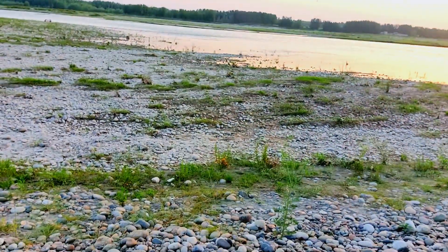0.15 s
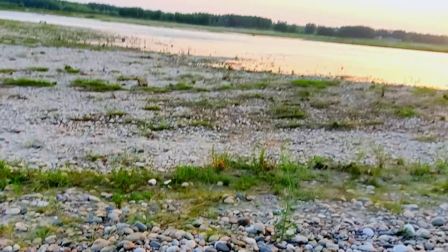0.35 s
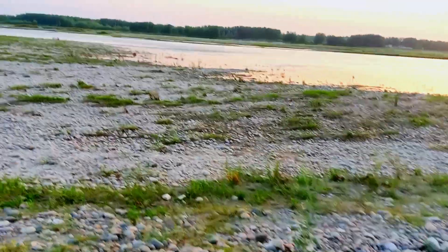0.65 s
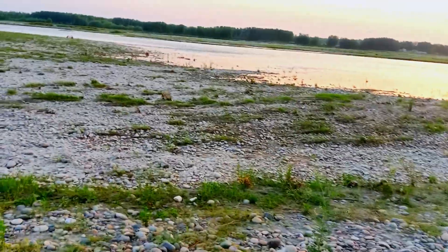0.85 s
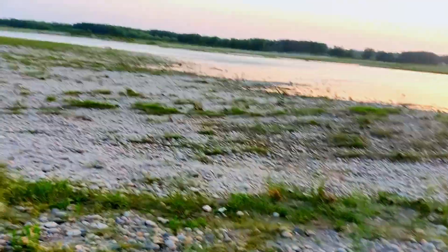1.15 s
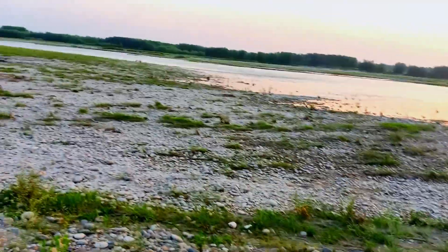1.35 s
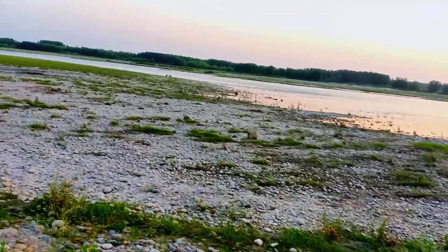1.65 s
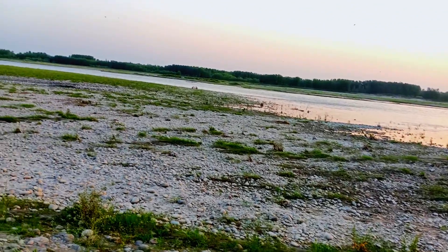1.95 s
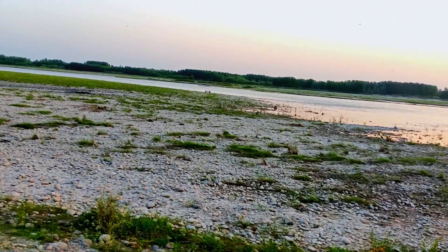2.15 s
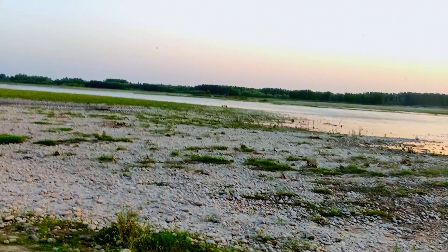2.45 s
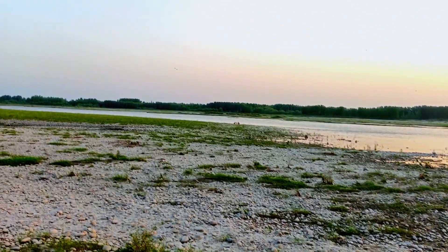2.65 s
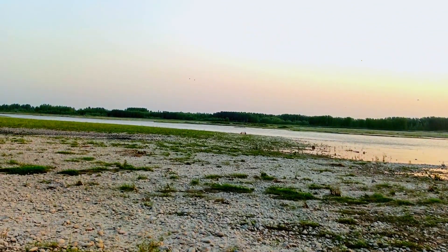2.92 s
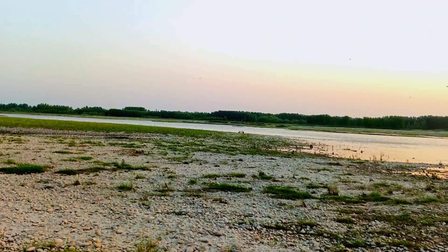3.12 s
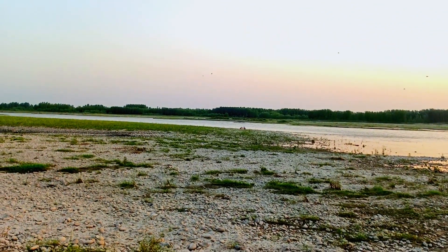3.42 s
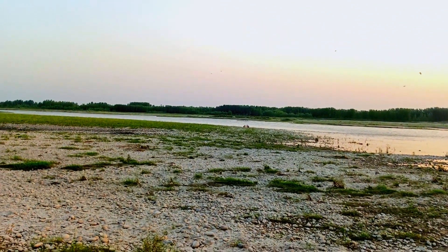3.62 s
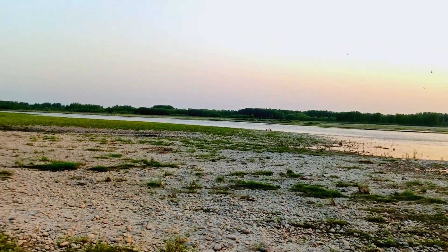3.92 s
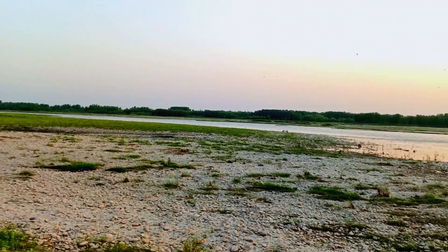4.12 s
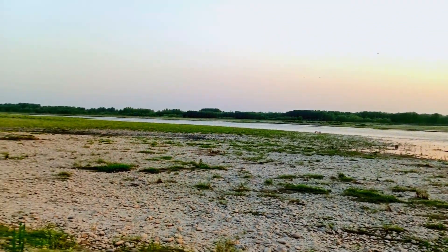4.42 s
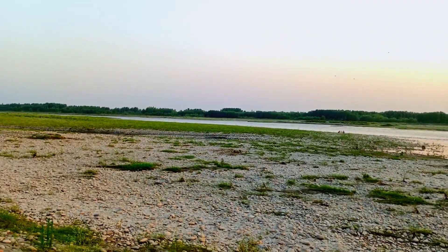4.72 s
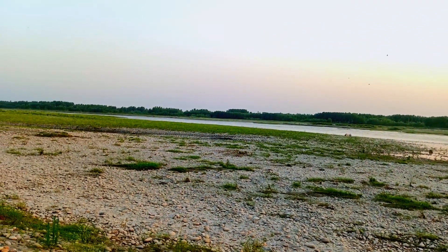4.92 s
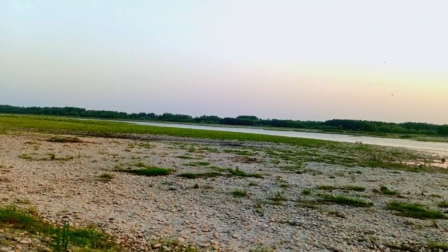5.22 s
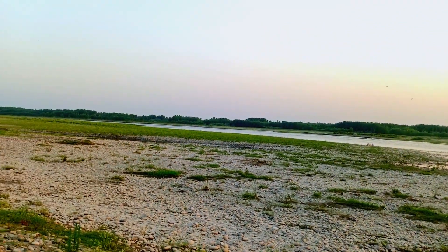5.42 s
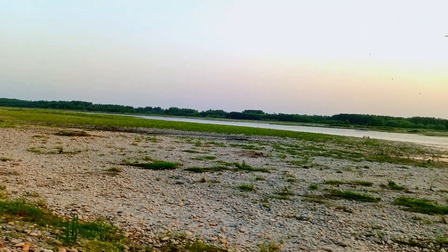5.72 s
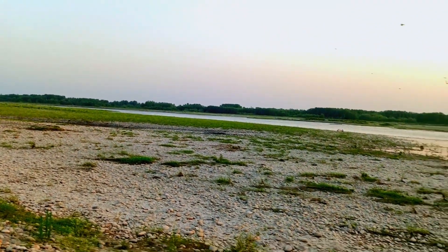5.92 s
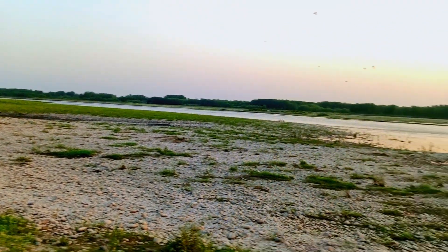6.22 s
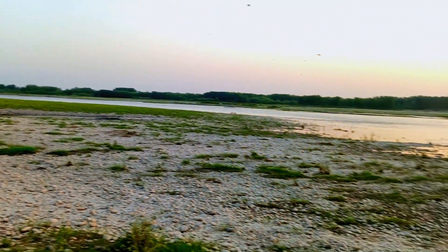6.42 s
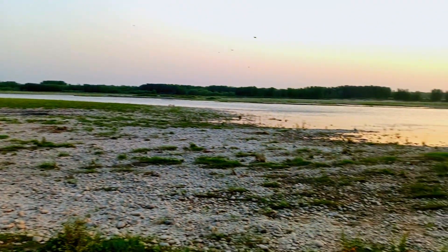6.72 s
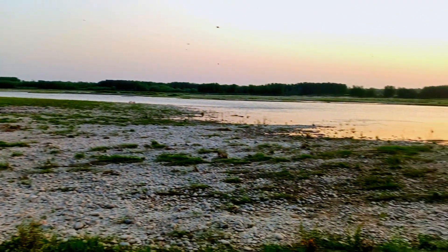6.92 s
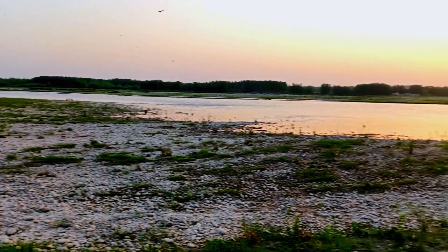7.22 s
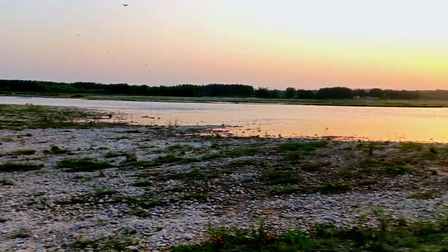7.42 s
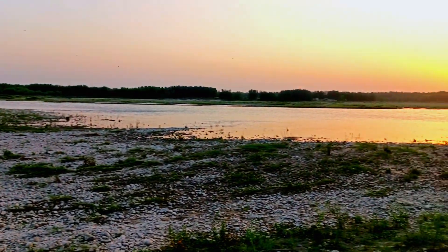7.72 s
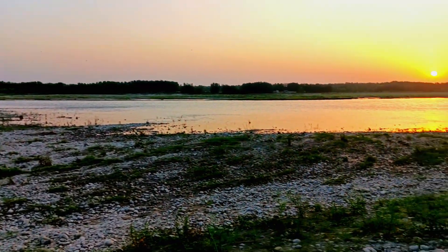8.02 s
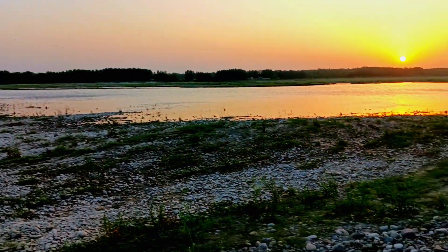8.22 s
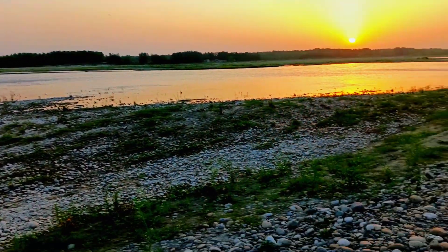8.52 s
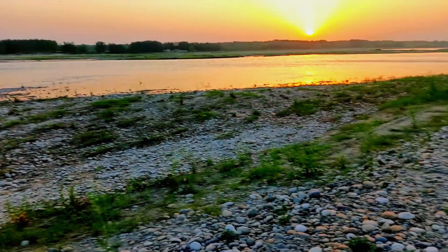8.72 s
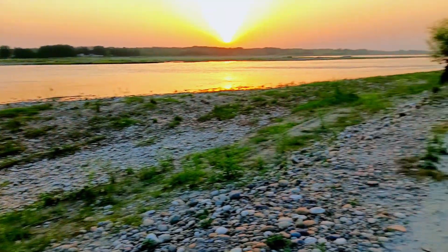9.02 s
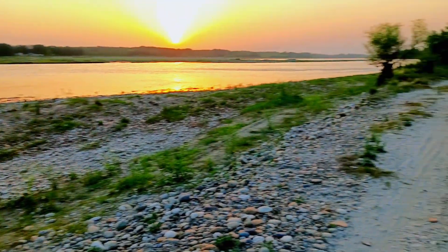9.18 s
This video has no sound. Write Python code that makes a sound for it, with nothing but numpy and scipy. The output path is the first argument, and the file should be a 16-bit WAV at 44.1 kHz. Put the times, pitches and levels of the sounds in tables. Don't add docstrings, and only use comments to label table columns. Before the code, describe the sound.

On an open gravel riverbank at dusk, a distant flock gives hoarse, overlapping squawks and croaks over a continuous high buzz of bush crickets. Early on, a shoe scrapes grit and pebbles snap close by. A clear two-note whistle falls around three seconds. Calls bunch and thin out, growing strong near seven to eight seconds. Low gusts boom in the hand-held microphone, and soft thumps come from the grip.

```python
import sys
import numpy as np
from scipy import signal
from scipy.fft import rfft, irfft
from scipy.io import wavfile
from scipy.ndimage import uniform_filter1d

SR = 44100
rng = np.random.default_rng(int(sys.argv[2]) if len(sys.argv) > 2 else 0)


def ratio_of_db(decibels):
    return 10 ** (np.asarray(decibels, float) / 20)


def generate_wav(sig):
    pcm = np.round(np.clip(np.atleast_2d(sig).T, -1, 1) * 32767).astype(np.int16)
    wavfile.write(sys.argv[1], SR, pcm)


N = 412335
TIME = np.arange(N) / SR


def rms_one(x):
    return x / np.sqrt(np.mean(x ** 2) + 1e-20)


def in_time(rows):
    s, *columns = np.transpose(rows)
    return [np.interp(TIME, s, c) for c in columns]


def drift(rate):
    r = np.exp(-80 * np.pi * rate / SR)
    slow = signal.lfilter([1], [1, -2 * r, r * r], rng.standard_normal(N // 40 + 2002))[2000:]
    return np.interp(np.arange(N) / 40, np.arange(len(slow)), rms_one(slow))


def coloured(spectrum):
    hz, level_db = np.transpose(spectrum)
    grid = np.log(np.fft.rfftfreq(N, 1 / SR) + 1)
    gain = ratio_of_db(np.interp(grid, np.log(hz), level_db))
    return rms_one(irfft(rfft(rng.standard_normal(N)) * gain, N))


def resonate(x, hz, width_hz, even=0.):
    turn = np.exp(2j * np.pi * np.cumsum(np.broadcast_to(hz, x.shape)) / SR)
    base = signal.lfilter(*signal.butter(3, width_hz / 2, fs=SR), x / turn)
    evened = base / (np.abs(base) + 1e-9) ** even
    return rms_one((evened * turn).real)


def rasp(per_s, breath, jitter, duty):
    cycles = np.cumsum(per_s * (1 + jitter * drift(25))) / SR
    clicks = (np.diff(np.floor(cycles), prepend=0) > 0) * ratio_of_db(2.1 * drift(52))
    puffs = rng.standard_normal(N) * np.exp(-(cycles % 1) / duty)
    breath = np.clip(breath, 0, 1)
    return (1 - breath) * rms_one(clicks) + breath * rms_one(puffs)


def kind(table, glide, width_hz):
    return [(s, s + length, hz * (1 - glide / 2), hz * (1 + glide / 2), width_hz, level_db)
            for s, length, hz, level_db in table]


def notes(rows, source, attack_s, even, sag=0., bend=0.82):
    out = np.zeros(N)
    for start, end, first_hz, last_hz, width_hz, level_db in rows:
        a, b = max(round(start * SR), 0), min(round(end * SR), N)
        age = np.arange(b - a) / SR
        progress = age / age[-1]
        shape = np.clip(np.minimum(age / attack_s, (age[-1] - age) / (0.37 * age[-1])), 0, 1)
        curve = bend if last_hz > first_hz else 1 / bend
        hz = first_hz + (last_hz - first_hz) * progress ** curve
        arched_hz = hz * (1 - sag * (2 * progress - 1) ** 2)
        out[a:b] += ratio_of_db(level_db) * shape * resonate(source[a:b], arched_hz, width_hz, even)
    return out


def bursts(tables):
    gains = np.zeros((len(tables[0][0]) - 1, N))
    for rows in tables:
        s, *levels_db = np.transpose(rows)
        span = slice(round(s[0] * SR), round(s[-1] * SR))
        t = TIME[span]
        edges = np.clip(np.minimum(t - s[0], s[-1] - t) / 0.015, 0, 1)
        gains[:, span] += edges * ratio_of_db(np.array([np.interp(t, s, level) for level in levels_db]))
    return gains


def swells(table, swell_db, fade_db):
    return bursts([[(start, *np.subtract(peak_db, swell_db)),
                    (top, *peak_db),
                    (end, *np.subtract(peak_db, fade_db))]
                   for start, top, end, *peak_db in table])


def flock():
    # start_s, length_s, middle_pitch_hz (top pitch for arches), level_db
    falls = [
        (0, 0.13, 1890, -44.5),
        (.163, 0.31, 1384, -47.5),
        (2.831, 0.19, 1120, -38.5),
        (2.912, .14, 1477, -40.5),
        (3.012, 0.41, 1420, -53),
        (4.69, 0.27, 1817, -39),
        (5.821, 0.197, 1430, -49),
        (7.248, 0.13, 1555, -42.5),
    ]
    croaks = [
        (.06, 0.31, 1880, -52),
        (.256, 0.2, 1800, -42),
        (2.668, 0.33, 1880, -41),
        (4.387, 0.43, 1500, -50),
        (6.594, 0.27, 1939, -42),
        (7.497, 0.22, 1946, -38.5),
        (8.12, .29, 1663, -35),
    ]
    murmurs = [(6.46, .11, 1870, -48), (5.47, .04, 880, -56), (6.08, .13, 2400, -62), (8.12, .1, 1280, -47),
               (8.24, .1, 1300, -49), (7.9, .07, 1290, -56), (7.86, .06, 1550, -52), (8.13, .2, 1800, -40),
               (2.69, .24, 2050, -45), (2.72, .2, 1850, -44), (3.3, .2, 1720, -43), (7.5, .2, 940, -58),
               (.38, 0.033, 2410, -55), (.56, 0.064, 1880, -53), (.65, 0.13, 1740, -55),
               (.76, .04, 2140, -58), (1.27, 0.18, 2050, -57.5), (1.28, 0.11, 1560, -54),
               (2.45, .05, 2644, -62), (7.08, .14, 1817, -47.5), (1.12, 0.11, 610, -61.5),
               (1.62, 0.071, 1840, -49.5), (1.785, .11, 1060, -50.5), (2.57, 0.11, 1353, -43),
               (2.9, 0.053, 2710, -60.5), (2.95, 0.085, 2000, -58), (3.21, 0.15, 1386, -47),
               (3.4, 0.24, 2500, -64), (3.88, 0.062, 604, -54), (4.0, .05, 595, -60),
               (4.27, .16, 1845, -47.5), (4.41, 0.048, 2670, -54), (6.64, 0.075, 900, -59),
               (6.88, .12, 1170, -52), (7.59, 0.12, 923, -58), (8.4, .15, 1890, -58), (8.4, .11, 1545, -56),
               (8.88, 0.068, 2000, -51), (8.89, .14, 1570, -55), (9.12, .07, 1860, -55),
               (9.2, .13, 1464, -55), (9.24, .08, 2400, -62.5), (2.76, 0.19, 4130, -64),
               (8.53, 0.27, 1770, -50.5)]
    holds = [(.74, .08, 1450, -47), (.762, 0.33, 1763, -49), (1.694, 0.12, 1800, -44),
             (1.77, 0.12, 2130, -46.5), (2.645, 0.22, 1405, -36), (3.065, 0.11, 1520, -42.5),
             (3.367, 0.12, 1290, -45.5), (4.545, 0.21, 1872, -44), (4.665, 0.093, 1497, -36.5),
             (5.141, 0.086, 1460, -47.5), (5.597, 0.082, 1430, -41), (5.84, 0.17, 1930, -50),
             (6.04, 0.23, 1456, -47.5), (6.457, 0.31, 1400, -49), (6.867, 0.17, 1430, -39),
             (6.943, .35, 1768, -47.5), (7.024, 0.14, 1280, -48.5), (7.51, 0.25, 1778, -35),
             (7.948, 0.2, 1500, -44), (8.965, 0.12, 1883, -41)]
    rises = [(1.104, .11, 1460, -42), (1.635, 0.25, 1405, -43.5), (1.778, .12, 1595, -36.5),
             (2.32, 0.34, 1680, -49), (3.292, 0.051, 2055, -36), (3.641, .17, 1585, -44.5),
             (3.828, 0.13, 1596, -49), (4.115, 0.12, 1595, -37.5), (5.481, 0.083, 1870, -43),
             (5.56, 0.28, 950, -55.5), (7.482, 0.12, 1516, -35.5), (7.719, 0.25, 1546, -53),
             (7.894, 0.13, 2000, -54.5), (7.964, 0.32, 1950, -41.5), (9.202, 0.2, 1935, -48)]
    sweeps = [
        (2.565, .21, 2540, -47.5),
        (2.6, 0.18, 4020, -51),
        (7.41, 0.085, 2700, -51.5),
        (1.114, 0.104, 2000, -46),
    ]
    squawks = [(1.637, 0.43, 1710, -44), (2.527, 0.084, 1540, -45), (2.577, 0.47, 1710, -41.5),
               (3.196, 0.098, 1510, -44), (3.294, 0.25, 1850, -37), (3.913, 0.23, 1835, -47),
               (4.037, 0.48, 1683, -45.5), (4.652, 0.34, 1773, -35), (4.867, 0.26, 1660, -48),
               (5.45, 0.16, 1693, -41), (5.58, .3, 1600, -46), (5.801, 0.45, 1606, -49),
               (5.828, 0.49, 2640, -65), (6.845, 0.29, 1784, -34.5), (7.235, 0.25, 1750, -43),
               (7.395, 0.48, 1733, -39), (8.16, 0.16, 1602, -39), (8.39, 0.16, 1680, -57)]
    arches = [(5.58, .27, 1960, -45), (2.68, 0.23, 2245, -49), (3.292, 0.19, 2207, -43),
              (3.92, 0.19, 2220, -52), (4.66, .3, 2320, -54), (6.597, 0.19, 2320, -45),
              (6.853, 0.24, 2295, -41), (7.5, 0.26, 2255, -50), (8.15, .22, 2200, -44.5),
              (7.22, .16, 2180, -50)]
    voice, harsh = rasp(95, 0.59, .12, 0.59), rasp(150, .36, .045, .8)
    other_voice = voice[::-1]
    near = notes(kind(rises, 0.08, 150) + kind(holds, -0.032, 113), voice, 0.016, 0.35)
    near = near + notes(kind(falls, -.2, 88), voice, .016, .6, bend=1.0)
    near = near + notes(kind(squawks, 0.0055, 530) + kind(croaks, 0.021, 370), harsh, 0.014, 0.27)
    near = near + notes(kind(arches, -.02, 152), harsh, 0.0092, 0.26, sag=.14)
    near = near + notes(kind(sweeps, 0.18, 170), other_voice, 0.017, 0.24, bend=.5)
    near = near + notes(kind(murmurs, -0.034, 101), other_voice, 0.016, 0.37)
    far = crowd(1334, 2070, 130, -73, count=260)
    high_streaks = crowd(2400, 9200, 120, -88, count=230)
    return near + barks() + far + high_streaks


def crowd(low_hz, high_hz, width_hz, level_db, count):
    draws = rng.random((count, 5))
    starts = 9.2 * draws[:, 0]
    ends = starts + 0.067 + 0.12 * draws[:, 2]
    pitches = low_hz * (high_hz / low_hz) ** draws[:, 1]
    last_pitches = pitches * (1 + 0.066 * (draws[:, 3] - .5))
    rows = np.transpose([starts, ends, pitches, last_pitches, width_hz + 0 * starts, level_db + 15.8 * draws[:, 4]])
    return notes(rows, rasp(110, 1.0, .15, 0.42), 0.0096, 0.067)


def crickets():
    # time_s, near_db, far_db
    group_levels = [(0, -58, -79), (.36, -53, -61), (.55, -58, -66.5), (.85, -50, -77), (1.17, -57, -77),
                    (1.28, -69, -83), (1.53, -51, -64), (1.85, -57, -69), (2.08, -69, -81),
                    (2.33, -51, -68), (2.7, -55, -75), (3.67, -50, -66), (4.9, -54.5, -74),
                    (5.36, -51.5, -66.5), (7.29, -50.5, -63.5), (8.44, -51, -64.5), (8.75, -50.5, -72.5),
                    (9.35, -49, -59.5)]
    # time_s, pitch_hz
    far_pitch = [(0.0, 9370), (0.75, 9320), (2.08, 9410), (2.63, 9250), (4.32, 9380), (5.18, 9310),
                 (5.75, 9460), (6.48, 9370), (9.35, 9260)]
    # start_s, length_s, middle_pitch_hz, level_db
    stray_buzzes = [
        (3.2, .95, 8770, -74),
        (8.0, 0.68, 9680, -64.5),
        (8.87, 0.5, 8543, -62),
    ]
    near_db, far_db = in_time(group_levels)
    near = resonate(rasp(66.2, .95, .004, .75), 7800, 600)
    near = near + 0.7 * resonate(rasp(62.5, 0.86, 0.0066, 1.0), 7505, 460)
    strokes = rasp(60.7, .95, .004, .5)
    far = resonate(strokes, in_time(far_pitch)[0], 470)
    shrill = resonate(rasp(58, 0.7, 0.0027, 0.74), 10800, 500)
    far = far + 0.16 * ratio_of_db(1.5 * drift(3.6)) * shrill
    strays = notes(kind(stray_buzzes, glide=.01, width_hz=200), strokes, 0.062, 0)
    near_gain, far_gain = ratio_of_db(near_db + 1.0 * drift(0.74)), ratio_of_db(far_db + 2.4 * drift(4.8))
    return near_gain * rms_one(near) + far_gain * far + strays


def air():
    # time_s, level_db
    hiss_level = [(0.0, -74), (1.48, -72.5), (2.14, -72), (2.29, -73), (6.56, -68.5), (9.35, -72.5)]
    # pitch_hz, level_db (per Hz)
    hiss_spectrum = [(20, -47), (40, -5.5), (134, 3.5), (257, -6), (1120, -12), (1600, -3), (2580, -17.5),
                     (6300, -26), (8600, -24.5), (10100, -32), (15800, -39)]
    return ratio_of_db(in_time(hiss_level)[0] + 18 + 1.4 * drift(5.1)) * coloured(hiss_spectrum)


def gravel():
    # start_s, strongest_s, end_s, bright_db, dull_db
    shuffles = [
        (.07, .19, 0.32, -70, -90),
        (.27, .32, 0.37, -60, -65),
        (.36, .39, 0.43, -63, -68),
        (.45, .465, 0.73, -75, -88.5),
        (1.1, 1.135, 1.2, -64, -65),
        (1.165, 1.185, 1.19, -60, -52),
        (1.46, 1.56, 2, -72, -66),
        (1.95, 2.02, 2.06, -81, -53),
        (2.3, 2.35, 3.2, -79, -75),
    ]
    # start_s, strongest_s, end_s, bright_db, dull_db
    drag = [
        (1.85, 2.3, 2.36, -68.5, -59.5),
    ]
    # pitch_hz, level_db (per Hz)
    dull_spectrum = [(600, 1), (1500, 7.5), (3500, -10), (5200, 3.5), (6800, -12), (9000, -11),
                     (11000, -36)]
    # start_s, peak_db
    snaps = [
        (0.4498, -38),
        (0.7916, -32),
        (1.18, -34.5),
    ]
    slides = swells(shuffles, swell_db=19, fade_db=15)
    bright_gain, dull_gain = slides + swells(drag, swell_db=1.5, fade_db=5)
    bright = resonate(rng.standard_normal(N), 10800, 7000)
    grit = ratio_of_db(4.5) * bright_gain * bright + ratio_of_db(7.0) * dull_gain * coloured(dull_spectrum)
    out = ratio_of_db(1.2 * drift(30)) * grit
    crack = signal.sosfilt(signal.butter(3, 3800, "high", fs=SR, output="sos"), rng.standard_normal(N))
    for s, level_db in snaps:
        age = np.maximum(TIME - s, 0)
        snap_and_scatter = 2.7 * np.exp(-age / 0.00025) + 0.56 * np.exp(-age / 0.013)
        out += ratio_of_db(level_db - 6.5) * (TIME >= s) * snap_and_scatter * crack
    return out


def wind():
    # start_s, strongest_s, end_s, peak_db
    low_gusts = [(.107, .12, 0.16, -46.5), (.203, .253, 0.31, -39.5), (.729, .761, 0.79, -39.5),
                 (.813, .867, 0.94, -41), (1.246, 1.27, 1.35, -47.5), (2.561, 2.649, 2.77, -37.5),
                 (3.204, 3.215, 3.247, -43), (3.485, 3.495, 3.53, -42), (3.573, 3.667, 3.98, -35),
                 (4.086, 4.3, 4.55, -35), (4.48, 4.75, 5.28, -34), (5.295, 5.617, 5.93, -41),
                 (5.702, 5.966, 6.23, -34.5), (6.596, 6.642, 6.8, -42.5), (6.901, 6.915, 7, -53),
                 (7.306, 7.388, 7.64, -33.5), (7.618, 7.918, 8.12, -37.5), (8.184, 8.224, 8.9, -55),
                 (8.316, 8.335, 8.35, -40), (8.44, 8.5, 8.1, -48), (8.863, 8.93, 9.13, -41.5),
                 (9.14, 9.155, 9.185, -48)]
    # start_s, strongest_s, end_s, peak_db
    upper_gusts = [(1.895, 1.99, 2.046, -36.5), (2.05, 2.3, 2.32, -44.5), (3.549, 3.56, 3.61, -44.5),
                   (5.3, 5.33, 5.4, -53.5), (5.445, 5.7, 5.9, -42.5), (5.876, 6.15, 6.26, -42),
                   (6.64, 6.65, 6.74, -51), (6.86, 6.91, 7.22, -38.5), (7.13, 7.34, 7.42, -38),
                   (7.502, 7.515, 7.52, -42), (7.61, 7.665, 7.7, -37), (7.71, 7.78, 7.83, -40)]
    low = resonate(rng.standard_normal(N), 136.8, 64.2, 0.39)
    low = low + 0.087 * resonate(rng.standard_normal(N), 73, 42)
    upper = resonate(rng.standard_normal(N), 334, 64.3, 0.37)
    low_gain = swells(low_gusts, swell_db=9.5, fade_db=8.5)[0] + ratio_of_db(-65.0 + 4.2 * drift(1.8))
    upper_gain = swells(upper_gusts, swell_db=3, fade_db=6.5)[0] + ratio_of_db(-71.0 + 5.2 * drift(6.9))
    return low_gain * low + upper_gain * upper


def grip():
    # middle_s, peak_db, pitch_hz
    thumps = [
        (0.551, -35, 81),
        (1.029, -45, 60.5),
        (1.2, -43, 60),
        (1.361, -27, 76),
        (6.65, -41, 60),
        (4.929, -28, 89),
        (7.699, -24, 98),
        (8.916, -24, 94),
        (9.269, -41, 90),
    ]
    out = np.zeros(N)
    for s, level_db, hz in thumps:
        age = TIME - s
        out += ratio_of_db(level_db - 6.0) * np.exp(-(age / 0.014) ** 2) * np.sin(2 * np.pi * hz * age)
    return out


def strands():
    # start_s, length_s, middle_pitch_hz, level_db
    squeaks = [
        (.68, 0.095, 11200, -71),
        (.69, 0.065, 13000, -71),
        (.825, 0.093, 11700, -72),
        (.825, .04, 13200, -75),
        (1.356, .17, 8500, -67),
    ]
    sinking_glides = [(.9, 0.07, 11750, -72), (1.43, 0.082, 2660, -65), (1.523, 0.16, 8650, -57.5),
                      (1.982, 0.058, 717, -46), (3.36, 0.1, 873, -57), (5.09, .15, 620, -43.5),
                      (5.58, .15, 990, -56), (5.753, 0.188, 626, -59.5), (6.93, 0.1, 886, -48),
                      (8.21, .1, 873, -50)]
    wisps = [
        (1.48, 0.18, 4940, -63),
        (1.733, .14, 6300, -60),
        (4.68, 0.25, 2220, -61),
        (7.57, 0.12, 4300, -59),
        (8.128, 0.25, 4160, -65.5),
        (8.218, .08, 5500, -66),
    ]
    overtones = [(1.72, .19, 3930, -58.5), (2.71, 0.2, 5870, -64), (2.71, .125, 4520, -59),
                 (3.33, 0.1, 4480, -53), (5.516, 0.081, 2820, -56), (5.92, 0.088, 2600, -59.5),
                 (6.61, 0.056, 5630, -59), (6.62, 0.13, 4530, -57.5), (6.63, .07, 5950, -66),
                 (6.9, .18, 4520, -64), (6.93, .17, 5420, -65), (6.89, .06, 3520, -62),
                 (7.0, .07, 3220, -62), (7.52, .15, 4100, -60), (7.5, .17, 4550, -64),
                 (7.54, .16, 6000, -68), (7.7, .1, 4200, -65), (7.22, .1, 4500, -66),
                 (6.85, .18, 6310, -61), (6.877, 0.11, 4000, -58), (7.54, .17, 5440, -64),
                 (8.97, 0.07, 2460, -57)]
    scuff = [
        (6.203, 0.25, 11000, -65),
    ]
    tops = [
        (6.858, 0.28, 4320, -55),
        (7.508, 0.36, 4900, -62),
    ]
    thin = kind(overtones, 0.017, 130) + kind(sinking_glides, -0.04, 62) + kind(wisps, .03, 410)
    thin = thin + kind(scuff, -.05, 2520) + kind(squeaks, .09, 70)
    combed = notes(kind(tops, .05, 3900), rasp(640, .55, .03, .9), .04, 0)
    return notes(thin, rasp(90, 0.7, .12, 1.0), 0.03, 0.055) + combed + whistle()


def barks():
    # start_s, peak_db, pitch_hz
    pulses = [(1.111, -27, 1407), (1.7449, -25, 1780), (2.529, -30.5, 1650), (4.6734, -19.5, 1530),
              (6.6004, -26, 1960), (6.8568, -29, 2030), (7.6539, -15.5, 1762), (7.6684, -26, 1756),
              (7.6915, -23, 1730), (7.7186, -26, 1715), (7.7397, -27, 1714), (8.1264, -29, 1780)]
    out = np.zeros(N)
    age = np.arange(2000) / SR
    envelope = np.minimum(age / .002, 1) * np.exp(-age / .008)
    for s, level_db, hz in pulses:
        a = round(s * SR)
        out[a:a + len(age)] += ratio_of_db(level_db - 1) * envelope * np.sin(2 * np.pi * hz * age)
    return out


def whistle():
    # time_s, pitch_hz, level_db
    path = [
        (2.895, 5730, -53),
        (2.95, 5270, -58),
        (2.999, 4560, -41.5),
        (3.045, 4430, -56),
        (3.091, 4330, -74),
        (3.134, 4050, -43),
        (3.225, 3820, -65),
    ]
    hz, level_db = in_time(path)
    sounding = np.clip(np.minimum(TIME - path[0][0], path[-1][0] - TIME) / 0.022, 0, 1)
    tone = np.sin(2 * np.pi * np.cumsum(hz * (1 + 0.003 * drift(60))) / SR)
    return np.sqrt(2) * sounding * ratio_of_db(level_db + 2.6 * drift(37)) * tone


def scene():
    birds = flock()
    echo = ratio_of_db(-14.5) * np.roll(birds, round(.023 * SR))
    birds = birds + echo + strands()
    return (birds + crickets() + wind() + grip() + gravel() + air())[None]


def suppress(x, strength, flutter_db):
    cells = signal.stft(x, nperseg=512, noverlap=384)[2]
    power = np.abs(cells) ** 2 + 1e-20
    held = uniform_filter1d(uniform_filter1d(power, size=13, axis=-1), size=2, axis=-2)
    around = uniform_filter1d(held, size=9, axis=-2)
    hunt = uniform_filter1d(rng.standard_normal(power.shape), size=18, axis=-1)
    hunt = uniform_filter1d(hunt, size=2, axis=-2)
    gain = (held / around) ** strength * ratio_of_db(flutter_db * rms_one(hunt))
    return signal.istft(cells * gain, nperseg=512, noverlap=384)[1][..., :N]


def roll_off(x):
    return signal.sosfilt(signal.butter(12, 15910, fs=SR, output="sos"), x)


def record(dry):
    cut = signal.sosfilt(signal.butter(2, 48, "high", fs=SR, output="sos"), dry)
    cut = signal.sosfilt(signal.ellip(10, .5, 70, 15800, fs=SR, output="sos"), cut)
    return roll_off(suppress(cut, strength=0.034, flutter_db=2.67))


dry = scene()
out = record(dry)
generate_wav(out)
```